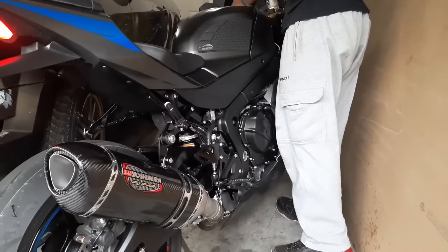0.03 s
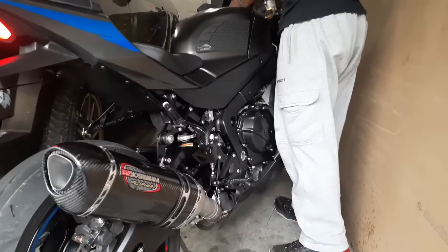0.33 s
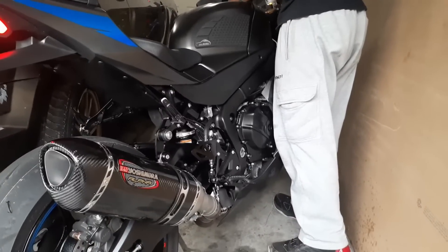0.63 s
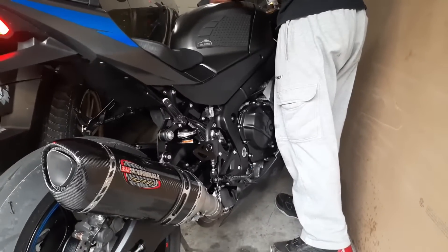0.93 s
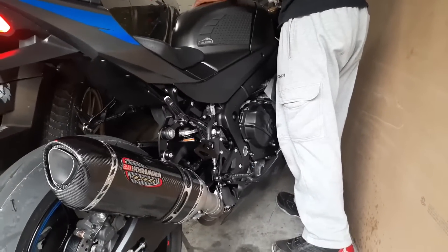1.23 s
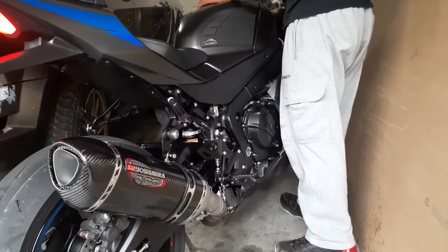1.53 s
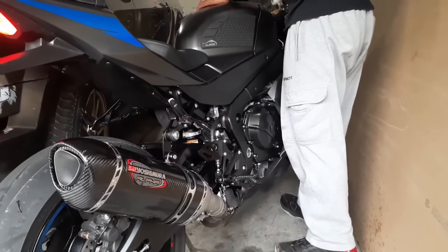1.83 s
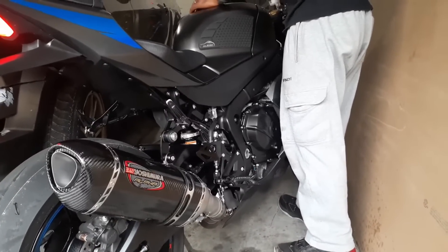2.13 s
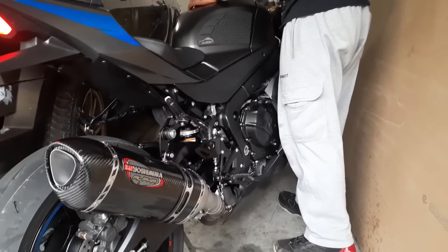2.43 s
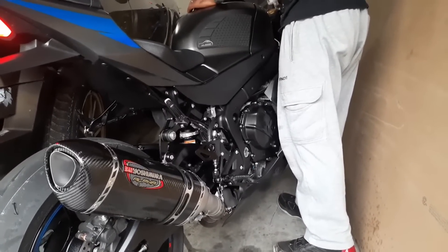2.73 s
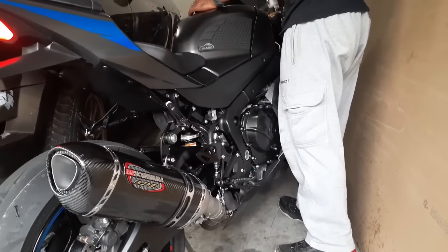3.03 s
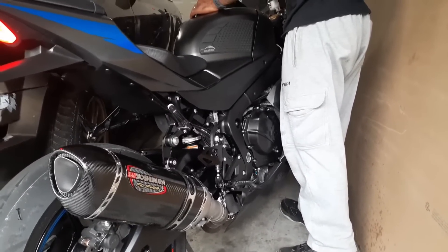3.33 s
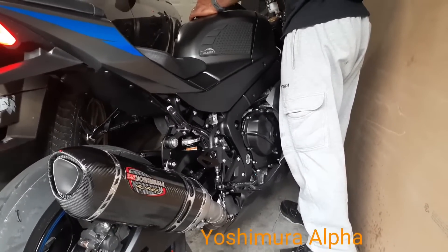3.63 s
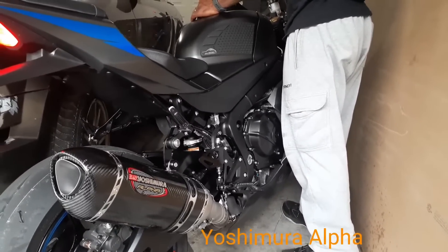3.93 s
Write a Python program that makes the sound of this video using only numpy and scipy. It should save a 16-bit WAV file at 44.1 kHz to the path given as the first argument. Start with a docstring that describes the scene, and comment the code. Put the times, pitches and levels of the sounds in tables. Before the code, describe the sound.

A motorcycle starts up close by in a garage. Faint clicks and a switch clack lead to two seconds of quiet fuel pump whirr. After a pause, the starter loudly clatters and whines, and the engine catches and idles.

```python
"""Faint clicks, then a clack: a motorcycle is switched on close by, over a garage's low rumble.
Its fuel pump starts with a soft thump and whirrs for two seconds (brushes, shaft, fuel, tank hum).
The starter drive slams home, and its gears whine and clatter against compression.
The four-cylinder engine catches and settles to a low idle: each firing rings the exhaust pipe
while the valve gear ticks and hisses."""
import sys
import numpy as np
from scipy import signal
from scipy.fft import rfft, irfft
from scipy.io import wavfile

SR = 44100
rng = np.random.default_rng(int(sys.argv[2]) if len(sys.argv) > 2 else 0)


def to_wav(sig):
    """Store sig (one row per channel, or 1-D mono) as 16-bit WAV at the path in sys.argv[1].

    Samples outside -1..1 are clipped; the rate is SR.
    """
    pcm = np.clip(np.atleast_2d(sig), -1, 1) * 32767
    pcm = np.round(pcm).astype(np.int16)
    wavfile.write(sys.argv[1], SR, pcm.T)  # frames by channels


N = 176400
TIME = np.arange(N) / SR
BINS_HZ = np.fft.rfftfreq(N, 1 / SR)
PAN_SPLIT = np.array([[.5], [-.5]])


def amp(db):
    """Decibels to gain."""
    return np.exp(np.asarray(db) * np.log(10) / 20)


def unit(x):
    """Scales to rms 1."""
    return x / np.sqrt(np.mean(x ** 2) + 1e-20)


def curve(table, column):
    """One table column over time."""
    rows = np.array(table)
    return np.interp(TIME, rows[:, 0], rows[:, column])


def read(points, hz):
    """Interpolates on a log-frequency axis."""
    f, value = np.transpose(points)
    return np.interp(np.log(hz + 1), np.log(f + 1), value)


def noise():
    """Stereo white noise."""
    return rng.standard_normal((2, N))


def tone(cycles):
    """Sinusoid with a random phase per channel."""
    return np.cos(2 * np.pi * (cycles + rng.random((2, 1))))


def wander(hz):
    """Random drift up to about hz, rms 1."""
    knots = rng.standard_normal(2048)
    return unit(np.interp(TIME * hz * 2, np.arange(len(knots)), knots))


def decay(start, t60):
    """Sharp attack, exponential fall."""
    age = np.maximum(TIME - start, 0)
    return np.minimum(age / 0.00064, 1) * amp(-60 * np.minimum(age / t60, 4))


def rattle(hits_per_s=3500, spread_db=2.5):
    """Dense metal impacts of uneven size."""
    size = amp(spread_db * np.minimum(rng.exponential(1, N), 4))
    return noise() * size * (rng.random(N) < hits_per_s / SR)


# Stereo image: (frequency [Hz], L-R correlation [ratio])
CORRELATION = [(30, 1), (150, 0.88), (300, 0.97), (700, 0.4), (1500, 0.11), (4000, .02), (15000, 0.037)]

def colour(x, spectrum, pan_db=0):
    """Gives two unrelated channels a correlation, a spectrum and an L-R balance; rms 1."""
    z, same = rfft(x), np.clip(read(CORRELATION, BINS_HZ), -1, 1)
    z = np.array([z[0], same * z[0] + np.sqrt(1 - same ** 2) * z[1]])
    return unit(irfft(z * amp(read(spectrum, BINS_HZ) + PAN_SPLIT * pan_db), N))


# Garage reverberation: (frequency [Hz], t60 [s])
GARAGE_T60 = [(100, 0.1), (600, 0.71), (3000, 0.28), (8000, 0.33), (15000, 0.56)]

def garage(x, wet_db):
    """Adds a diffuse tail, each band dying at its own rate."""
    hz, t, z = signal.stft(rng.standard_normal((2, SR // 2)), SR, nperseg=256)
    envelope = amp(-60 * t / read(GARAGE_T60, hz)[:, None]) * np.minimum(t / 0.005, 1)
    tail = signal.istft(z * envelope, SR, nperseg=256)[1]
    return x + amp(wet_db) * signal.fftconvolve(x, tail / np.linalg.norm(tail[0]), axes=1)[:, :N]


# Background spectrum: (frequency [Hz], relative level [dB])
RUMBLE = [(12, -63), (20, -55), (59, 1), (148, -6), (191, -11), (232, -11), (451, -12.5), (519, -22),
          (745, -12), (1100, -17), (2830, -25.5), (3080, -27), (3960, -36), (9120, -47), (15500, -53)]

def rumble():
    """Steady low room noise."""
    return amp(-43.5) * colour(noise(), RUMBLE)


# Clicks and pump-start thump: (time [s], level [dB], centre [Hz], t60 [s])
SMALL_HITS = [(0.111, -42.5, 2500, 0.24), (0.2858, -36.5, 3500, 0.027), (.502, -42, 704, 0.26),
              (0.98, -38, 2130, 0.066), (1.413, -38.5, 4170, .04), (1.466, -37.5, 3700, 0.04),
              (1.684, -45, 3830, .08), (2.485, -31.5, 710, .015), (2.486, -57, 10800, 0.16),
              (2.535, -64, 11000, 0.19), (2.756, -51.5, 6500, 0.11)]

def clicks_and_thump(half_width_oct=0.48):
    """Light clicks, and a soft thump as the fuel pump starts."""
    out = 0
    for start, db, hz, t60 in SMALL_HITS:
        band_db = -20 * np.log10(1 + (np.log2((BINS_HZ + 1) / hz) / half_width_oct) ** 2)
        out += amp(db) * decay(start, t60) * colour(noise(), np.c_[BINS_HZ, band_db], pan_db=3)
    return garage(out, wet_db=1.5)


# Switch spectrum: (frequency [Hz], relative level [dB])
SWITCH_CLACK = [(350, -44), (600, -9), (820, -5.5), (902, -6.5), (1660, -11), (1910, -12), (2240, -19),
                (2500, 2), (2830, -16), (4490, -11.5), (5000, -21), (5580, -7.5), (15500, -18)]

def switch():
    """The switch closes with one clack."""
    clack = amp(-28.5) * decay(start=.477, t60=0.12) * colour(noise(), SWITCH_CLACK, pan_db=1)
    return garage(clack, wet_db=2.5)


# Pump squeak: (peak time [s], half-width [s], frequency [Hz], level [dB])
SQUEAK_TONES = [(1.2, .04, 3005, -57), (1.2, .045, 4330, -56)]

def squeak():
    """Two wavering tones swell and fade in the pump."""
    out = 0
    for peak_s, width_s, hz, db in SQUEAK_TONES:
        cycles = np.cumsum(hz * (1 + 0.00734 * wander(hz=77.6))) / SR
        out += amp(db) * np.exp(-((TIME - peak_s) / width_s) ** 2) * tone(cycles)
    return out


# Tank resonances: (frequency [Hz], width [Hz], level [dB])
TANK_MODES = [(382, 22, -51), (438, 40, -53), (813.5, 6.1, -51.5), (808, 30, -56.5)]

def tank_hum():
    """The tank hums at its resonances."""
    out = 0
    for hz, width_hz, db in TANK_MODES:
        band_db = -20 * np.log10(1 + (2 * (BINS_HZ - hz) / width_hz) ** 2)
        out += amp(db) * colour(noise(), np.c_[BINS_HZ, band_db])
    return out


# Fuel hiss spectrum: (frequency [Hz], relative level [dB])
FUEL = [(100, -11), (300, -1.5), (520, -8.5), (750, -2), (1100, -13), (2000, -8), (4400, -15), (6000, -31),
        (8000, -20.5), (11000, -18), (14000, -19.5), (15500, -30)]
# Fuel hiss balance: (frequency [Hz], L-R [dB])
FUEL_PAN = [(300, -2), (1000, 15), (2200, 4.5), (3500, 10.5), (5000, -31), (7000, -3), (9500, -8),
            (12000, -5.5)]

def fuel_hiss():
    """Flowing fuel hisses unevenly."""
    return amp(-49 + 1.8 * wander(hz=11)) * colour(noise(), FUEL, read(FUEL_PAN, BINS_HZ))


# Brush spectrum: (frequency [Hz], relative level [dB])
BRUSH = [(200, -11), (600, -21), (1200, 2), (2200, -20.5), (3000, -6), (3700, -26), (4500, -6.5),
         (5600, -25), (7400, -16.5), (8400, -21), (9600, -15), (10150, -4), (11300, -20), (12600, -21),
         (13500, -2), (15300, -11)]
# Brush balance: (frequency [Hz], L-R [dB])
BRUSH_PAN = [(300, -8), (2500, -4), (5000, 25.5), (9500, -7), (13000, 2)]

def brush_buzz(turns, order_count=148, scatter_db=9.5, size=4096):
    """The brushes repeat one rough waveform every turn."""
    gains = amp(scatter_db * rng.standard_normal((2, order_count)).clip(-2, 2))
    orders = gains * np.exp(2j * np.pi * rng.random((2, order_count)))
    orders[:, 0] = 0
    buzz = np.array([np.interp(turns % 1 * size, np.arange(size), wave) for wave in irfft(orders, size)])
    flutter = 1 + 0.19 * wander(hz=39.6)
    return amp(-53.5) * colour(buzz * flutter, BRUSH, read(BRUSH_PAN, BINS_HZ))


# Shaft harmonics: (order [per turn], relative level [dB], L-R [dB])
SHAFT_ORDERS = [(28, -65, 1), (29, -65, 0), (41, -66, 0), (42, -63, -3), (43, -62, -1), (48, -67, -8),
                (78, -72, -5), (79, -71, -7), (88, -73, -8), (90, -71, -8), (95, -62, -10), (96, -64, -3),
                (97, -68, -6), (101, -68, -5), (102, -69, -5), (120, -73, -3), (125, -63, -4),
                (126, -63, -6), (127, -67, -3), (131, -66, 0), (134, -68, -1), (138, -69, -1)]

def shaft_tones(turns, start_s=0.51, rise_s=.08, gain_db=-4.5, flutter_db=2.5):
    """Some multiples of the shaft speed sing."""
    out = 0
    for order, db, pan_db in SHAFT_ORDERS:
        level_db = db + gain_db + PAN_SPLIT * pan_db + flutter_db * wander(hz=56.4)
        out += amp(level_db) * tone(order * turns)
    return out * np.clip((TIME - start_s) / rise_s, 0, 1)


# Pump motor: (time [s], shaft speed [Hz])
SHAFT_SPEED = [(.48, 80), (.52, 102), (.58, 105.1), (.88, 105.8), (.98, 106.1), (1.5, 106.25),
               (1.9, 105.55), (2.3, 105.4), (2.41, 105.7), (2.6, 70)]

def pump(on_s=.48, off_s=2.41, rise_s=0.025, fall_s=0.01):
    """The electric fuel pump spins up, whirrs and stops."""
    running = np.clip((TIME - on_s) / rise_s, 0, 1) * np.exp(-np.maximum(TIME - off_s, 0) / fall_s)
    turns = np.cumsum(curve(SHAFT_SPEED, 1) * (1 + 0.00048 * wander(hz=25))) / SR
    whirr = garage(running * (brush_buzz(turns) + fuel_hiss()), wet_db=-4.5)
    return whirr + running * (shaft_tones(turns) + tank_hum())


# Clatter envelope: (time [s], relative body level [dB], relative treble level [dB])
CLATTER_LEVELS = [(3.068, -65, -67), (3.073, -33, -42), (3.08, -28, -44), (3.105, -24, -36),
                  (3.125, -21, -24), (3.16, -24.5, -32), (3.2, -22, -25), (3.255, -22.5, -30),
                  (3.28, -23.5, -38), (3.315, -25.5, -39), (3.358, -44, -47), (3.385, -18.5, -28),
                  (3.42, -24.5, -42), (3.44, -28.5, -40.5), (3.476, -45, -47), (3.495, -18, -29),
                  (3.53, -24, -33.5), (3.56, -35, -43), (3.64, -62, -46)]
# Clatter spectra: (frequency [Hz], relative level [dB])
CLATTER_BODY = [(120, -60), (200, -17), (420, -12.5), (515, -26), (571, -9.5), (798, -9), (1170, -17),
                (1630, -1.5), (3090, -5.5), (3580, -2.5), (4080, -10.5), (4580, -6.5), (6500, -28),
                (8450, -35), (14300, -120)]
CLATTER_TREBLE = [(3530, -15), (6000, -4.5), (6520, -5.5), (7950, 0.5), (9020, -2), (9580, -5.5),
                  (12400, -6.5), (13800, -22), (14900, -14), (15500, -19)]
# Starter balance: (frequency [Hz], L-R [dB])
STARTER_PAN = [(60, -4), (130, -3), (290, 1.5), (640, -2.5), (1410, 4), (3100, 3.5), (6820, -8.5),
               (15000, 0.5)]
ENGAGED = (TIME > CLATTER_LEVELS[0][0]) & (TIME < CLATTER_LEVELS[-1][0])

def gear_clatter():
    """The starter's teeth rattle against compression."""
    pan_db = read(STARTER_PAN, BINS_HZ)
    body = colour(rattle(), CLATTER_BODY, pan_db) * amp(curve(CLATTER_LEVELS, 1) + 4.0)
    treble = colour(rattle(), CLATTER_TREBLE, pan_db) * amp(curve(CLATTER_LEVELS, 2) + 3.5)
    return garage(ENGAGED * (body + treble), wet_db=-3.5)


# Starter whine: (time [s], mesh rate [Hz], level [dB])
GEAR_MESH = [(3.075, 450, -42), (3.125, 860, -31), (3.17, 1000, -29), (3.205, 915, -19.5),
             (3.24, 820, -21.5), (3.275, 670, -21.5), (3.305, 530, -26), (3.362, 520, -35),
             (3.374, 950, -22), (3.4, 660, -22), (3.42, 565, -24), (3.477, 570, -34), (3.488, 920, -21),
             (3.525, 650, -24), (3.56, 620, -38), (3.65, 600, -65)]
# Gear housing response: (frequency [Hz], gain [dB])
GEAR_HOUSING = [(500, -12), (900, -9), (1600, -1), (2400, 0), (2950, -5), (3600, 2), (4500, -1),
                (5800, -20), (8000, -13), (11000, -18), (15000, -28)]

def gear_whine(teeth=9, jitter=.005, wobble_rad=.07):
    """Slightly eccentric starter gears whine, slowing as the pistons meet compression."""
    mesh_hz = curve(GEAR_MESH, 1)
    cycles = np.cumsum(mesh_hz * (1 + jitter * wander(hz=140))) / SR
    cycles += wobble_rad * np.sin(2 * np.pi * cycles / teeth) / (2 * np.pi)
    whine = sum(amp(read(GEAR_HOUSING, k * mesh_hz) + wander(hz=70)) * tone(k * cycles)
                for k in range(1, 15))
    return garage(ENGAGED * unit(whine) * amp(curve(GEAR_MESH, 2)), wet_db=-11)


# Drive impacts: (time [s], crack level [dB], crack t60 [s])
DRIVE_HITS = [(3.0759, -13, 0.12), (3.366, -9.5, 0.077), (3.482, -8.5, 0.093)]
# Impact spectrum: (frequency [Hz], relative level [dB])
DRIVE_CRACK = [(180, -46), (300, -29), (1220, -16), (1940, -11), (2600, -4), (3170, -8), (3560, 0.5),
               (4130, -12), (4640, -3), (6350, -19.5), (7120, -27), (10600, -19), (15500, -25.5)]
# Steel modes: (frequency [Hz], relative level [dB], t60 [s])
DRIVE_MODES = [(1630, 10, 0.13), (1845, -9, 0.19), (2300, -1, 0.25), (2510, 6.5, 0.27), (3570, -7, 0.11),
               (4550, -11, 0.12), (5800, 2, 0.094), (7260, -5, 0.3)]

def drive_clacks(ring_db=-18.5):
    """The starter drive slams home and its steel rings."""
    crack = colour(noise(), DRIVE_CRACK, read(STARTER_PAN, BINS_HZ))
    out = np.zeros((2, N))
    t = np.arange(SR // 3) / SR
    for start, db, t60 in DRIVE_HITS:
        ring = sum(amp(level - 60 * t / ring_s) * tone(hz * t) for hz, level, ring_s in DRIVE_MODES)
        first = int(start * SR)
        out[:, first:first + len(t)] += amp(db + ring_db) * ring
        out += amp(db) * crack * decay(start, t60)
    return garage(out, wet_db=-11)


# Valve gear and gas spectrum: (frequency [Hz], relative level [dB])
VALVE_HISS = [(260, -2), (450, -5.5), (514, -7.5), (790, -5.5), (1180, -11), (1490, -6), (1760, -7),
              (2620, -3), (4660, -8.5), (6000, -16), (8820, -21.5), (11900, -16.5), (15500, -23.5)]

def valve_gear(age, firings, catch_db=18.5, catch_s=0.017, throb=0.35):
    """Ticks and gas hiss flare as the engine catches, then throb with each firing."""
    level = np.clip(age / 0.0068, 0, 1) * amp(-28.5 + catch_db * np.exp(-np.abs(age) / catch_s))
    level *= 1 + throb * np.cos(2 * np.pi * firings)
    return garage(colour(rattle(), VALVE_HISS) * level, wet_db=0.5)


# Exhaust pipe modes: (nominal frequency [Hz], relative level [dB], t60 [s])
PIPE_MODES = [(92.6, -4, 0.18), (126.4, -1.5, 0.213), (188, -6, 0.1), (272, -11.5, 0.059),
              (321, -19.5, 0.14), (390.4, -26, 0.12)]

def exhaust_pulse(start, db, bark_db, bark_above_hz=220, rise_s=0.0012):
    """One puff of gas rings the pipe; bark is the gain of the upper modes."""
    t = np.arange(SR // 4) / SR
    ring = 0
    for hz, level, t60 in PIPE_MODES:
        envelope = amp(level + bark_db * (hz > bark_above_hz) - 60 * t / t60)
        ring += envelope * np.sin(2 * np.pi * hz * rng.uniform(0.876, 1.02) * t)
    out, first = np.zeros(N + SR), int(start * SR)
    out[first:first + len(t)] = -amp(db) * ring * (1 - np.exp(-t / rise_s))
    return out[:N]


# Cranking puffs: (time [s], strength [dB])
CRANK_PUFFS = [(3.248, -26.5), (3.361, -31), (3.481, -29.5), (3.548, -16.5)]
# Running engine: (time [s], firing rate [Hz], strength [dB], bark [dB])
FIRING = [(3.56, 43.06, -3.5, -16), (3.583, 50, -5, 12), (3.619, 56.5, -3.5, 9), (3.645, 47, -13.5, 8),
          (3.71, 47.7, -13.5, -5), (3.737, 48.7, -4.5, -1.5), (3.76, 47, -10.5, 2.5),
          (3.783, 48.5, -5.5, -1), (3.806, 44.2, -6.5, 6.5), (3.828, 38.3, -32, -9), (3.853, 43.7, -8, 0),
          (3.878, 46.6, -6, 1), (3.944, 45.3, -6, 1.5), (3.968, 48.5, -13, 9), (4, 41, -7, 5)]

def engine(pipe_band_hz=(54, 524)):
    """Soft cranking puffs, then uneven firings with the valve gear on top."""
    age = TIME - FIRING[0][0]
    firings = np.cumsum(curve(FIRING, 1) * (age > 0)) / SR
    onsets = np.flatnonzero(np.diff(np.ceil(firings)))
    strength_db, bark_db = curve(FIRING, 2), curve(FIRING, 3)
    pipe = sum(exhaust_pulse(i / SR, strength_db[i], bark_db[i]) for i in onsets)
    pipe += sum(exhaust_pulse(start, db, bark_db=5) for start, db in CRANK_PUFFS)
    pipe = signal.sosfilt(signal.butter(3, pipe_band_hz, "band", fs=SR, output="sos"), pipe)
    return garage(np.array([pipe, pipe]), wet_db=-9.5) + valve_gear(age, firings)


def scene():
    """Switch-on, starter and engine over the room's rumble."""
    return (rumble() + clicks_and_thump() + switch() + squeak() + pump()
            + gear_clatter() + gear_whine() + drive_clacks() + engine())


def record(dry):
    """Soft peak limiter, then a low-pass."""
    ceiling, cutoff_hz = 0.85, 15600
    rounded = dry / (1 + (dry / ceiling) ** 4) ** .25
    lowpass = signal.firwin(511, cutoff_hz, window=("kaiser", 9), fs=SR)
    return signal.oaconvolve(rounded, lowpass[None], "same", axes=1)


dry = scene()
out = record(dry)
to_wav(out)
```